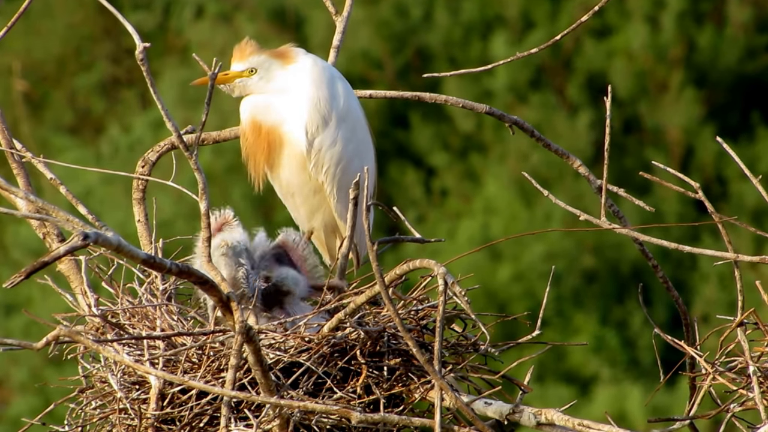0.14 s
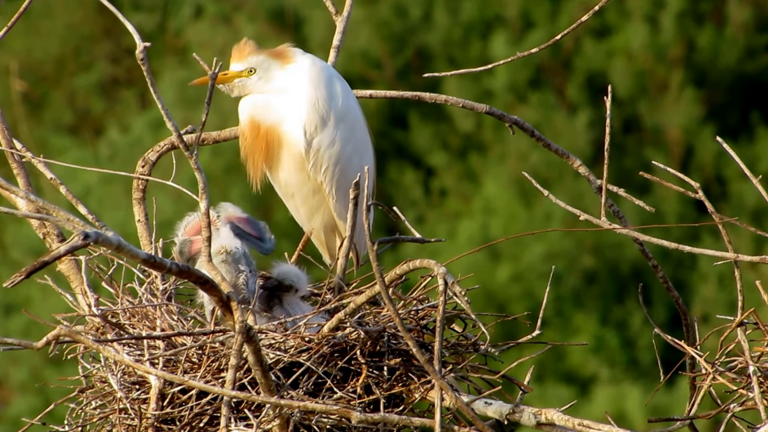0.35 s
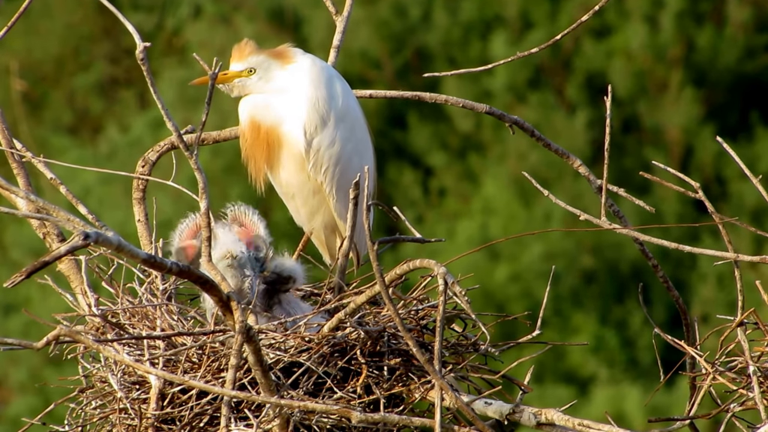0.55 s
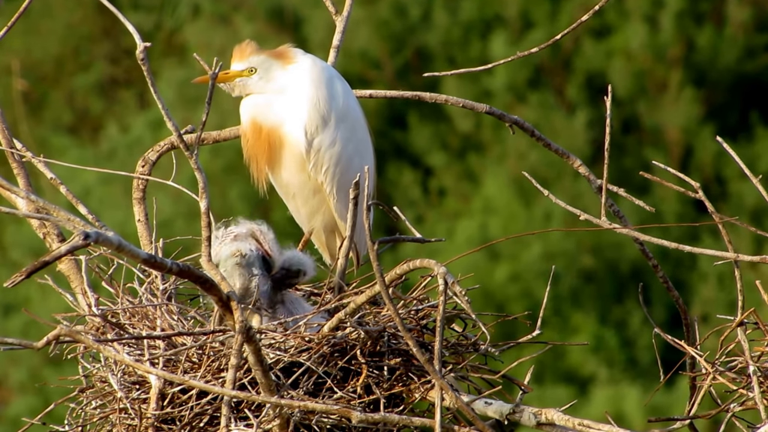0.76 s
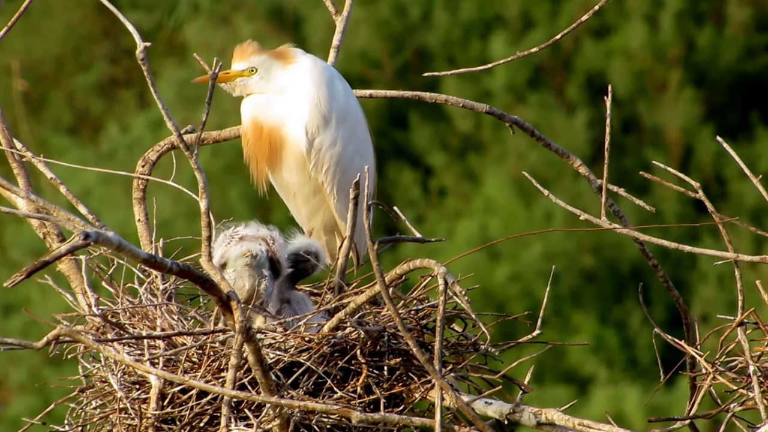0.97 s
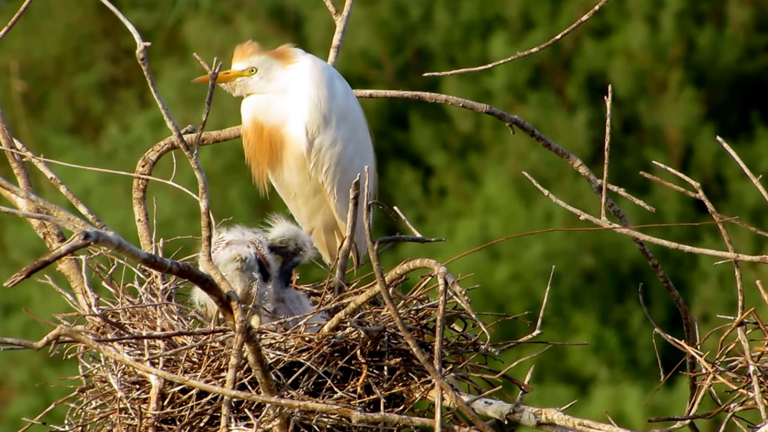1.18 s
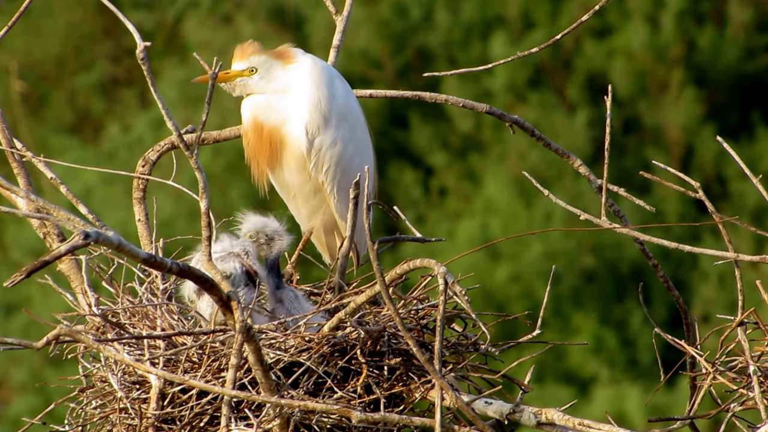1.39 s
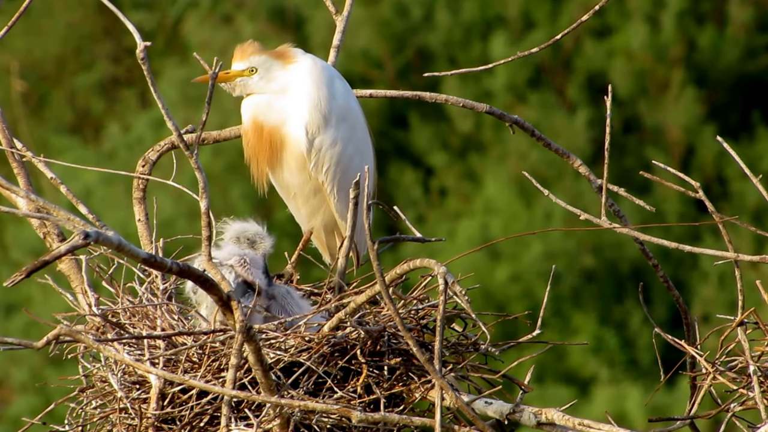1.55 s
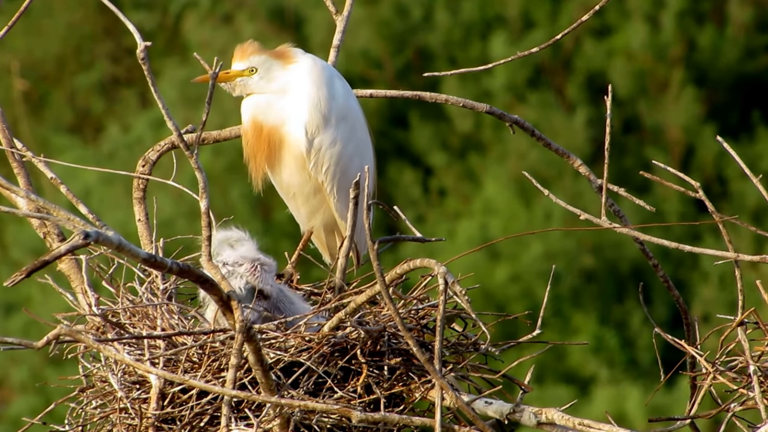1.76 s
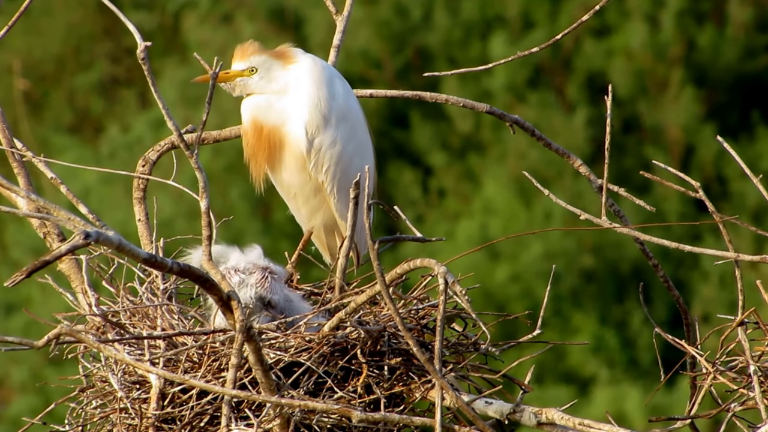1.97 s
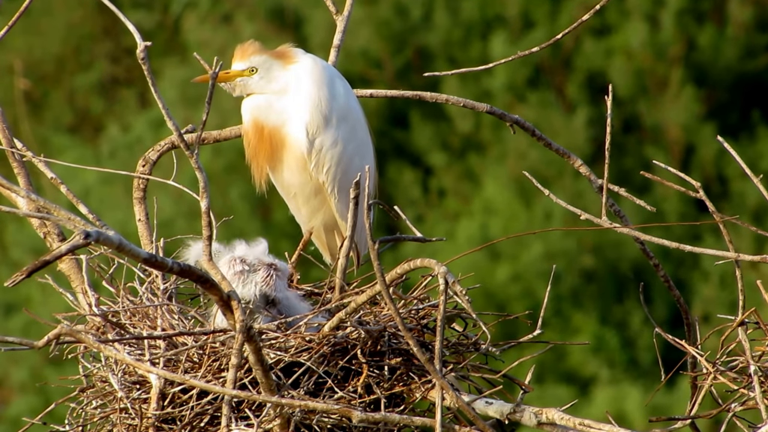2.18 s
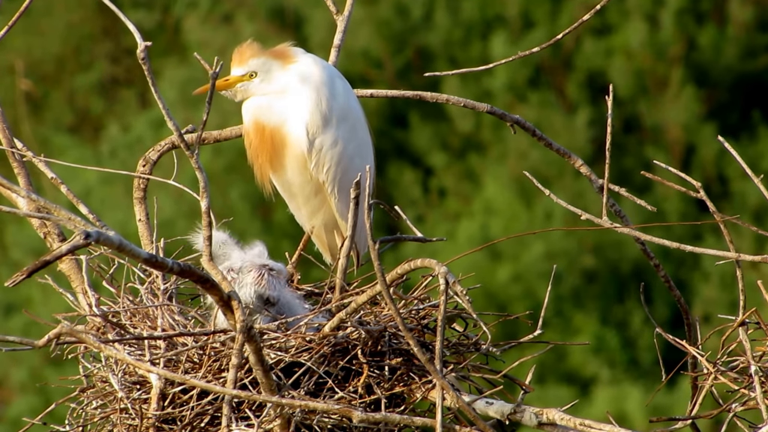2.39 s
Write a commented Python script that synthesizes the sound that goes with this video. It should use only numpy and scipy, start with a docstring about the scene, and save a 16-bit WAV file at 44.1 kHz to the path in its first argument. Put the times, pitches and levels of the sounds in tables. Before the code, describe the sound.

Hoarse egret squawks in a colony: one at 0.7-1.0 s, a longer, stronger, rougher one at 1.6-2.0 s. Short peeps and squeals scatter throughout, with rasps densest from 1.2 s and around 2.2 s. Dry close ticks with treble whirr at 0.1 and 2.43 s. Steady rush, a faint low engine, and wind thumps at the start and near 2.2-2.3 s; short branch echoes.

```python
"""Two long hoarse heron squawks in a colony: jittering harmonics and pulsed breath, filtered by a throat.
Around them come squeals, peeps and low far grunts (bent partials with sidebands), and rasps, further low grunts
and the rough breath of calls (grainy noise in one band). Dry ticks close to the microphones are decaying sines
in a treble whirr; a far idling engine is a sum of low sines.
The colony's rush and the wind on the two microphone ports are coloured noise."""
import sys
import numpy as np
from scipy import signal
from scipy.fft import rfft, irfft, next_fast_len
from scipy.io import wavfile
from scipy.ndimage import uniform_filter1d, map_coordinates

SR = 44100
rng = np.random.default_rng(int(sys.argv[2]) if len(sys.argv) > 2 else 0)


def master(y):
    """Save y as 16-bit WAV."""
    cut = np.clip(np.atleast_2d(y).T, -1, 1)
    pcm = np.round(cut * 32767)  # scale
    wavfile.write(sys.argv[1], SR, pcm.astype(np.int16))


N = 112014
T = np.arange(N) / SR

# Squeals, peeps and low far grunts of the colony. Each row: start in seconds, length in seconds,
# first, middle and last pitch in Hz, levels of partials 1 to 5 in dB, level of the quarter-pitch sidebands in dB,
# roughness 0-1, left minus right in dB.
TONAL_CALLS = [(0, 0.06, 1373, 1336, 1350, -51.5, -73, -79, -78, -81, -30, 0, -3),
               (0.177, 0.068, 1602, 1565, 1630, -53.5, -54.5, -70, -64, -74, -30, 0.5, -6),
               (0.336, 0.08, 592, 656, 687, -53, -59.5, -64, -74, -62, -28, 0.5, -3),
               (1.248, 0.084, 1255, 1267, 1344, -55, -60, -69, -74, -76, -30, 0.6, -3),
               (0.023, 0.026, 1705, 1840, 1790, -57, -50.5, -71, -74, -66, -30, 0.45, 2),
               (0.04, 0.057, 1708, 1680, 1710, -69, -52, -70, -72, -77, -30, 0.4, -2),
               (0.169, 0.053, 1846, 1825, 1700, -53, -45.5, -60, -59, -62, -32, 0.12, 2),
               (0.324, 0.049, 1787, 1818, 1770, -50, -47, -61, -66, -56, -30, 0.16, -3),
               (0.488, 0.058, 2640, 2590, 2510, -49, -62, -61, -72, -76, -40, 0.11, -3),
               (0.626, 0.035, 1660, 1790, 1810, -67, -47, -69, -65, -73, -37, 0.15, -1),
               (0.681, 0.043, 1855, 1910, 1960, -52, -52, -61, -80, -82, -30, 0.27, -1),
               (0.721, 0.067, 1792, 1780, 1767, -51, -51, -49.5, -62, -70, -23, 0.15, 2),
               (0.752, 0.045, 2010, 2000, 1990, -45, -49, -62, -75, -73, -20, 0.3, -2),
               (0.79, 0.09, 2060, 2055, 2110, -38.5, -46.5, -50, -66, -66, -18, 0.14, -2),
               (0.856, 0.049, 2138, 2210, 2084, -44, -44.5, -48.5, -68, -67, -22, 0.29, 1.5),
               (0.906, 0.11, 2220, 2183, 2240, -43.5, -64, -70.5, -80, -74, -30, 0.46, -2.5),
               (1.084, 0.025, 1926, 1894, 1890, -57, -53.5, -63, -79, -74, -9, 0.5, -5),
               (1.211, 0.053, 1890, 1910, 2030, -51, -52.5, -56.5, -66, -69, -30, 0.5, -2),
               (1.135, 0.053, 2740, 2744, 2750, -54, -78, -81, -81, -80, -30, 0.35, -1),
               (1.554, 0.028, 1590, 1600, 1590, -50, -62, -64, -72, -76, -30, 0.5, -2),
               (1.345, 0.045, 2120, 1990, 1900, -48, -72, -76, -65, -58, -15, 0.3, 1),
               (1.399, 0.14, 2100, 2100, 2070, -43, -42.5, -46, -61.5, -66, -2, 0.16, -2),
               (1.632, 0.11, 1802, 1816, 1887, -52, -44.5, -70, -83, -76, -25, 0.17, -4),
               (1.9, 0.066, 2065, 1986, 1940, -48.5, -68, -72, -76, -78, -30, .2, -2),
               (1.825, 0.033, 1740, 1790, 1850, -59, -49, -72, -69, -76, -30, .3, -10),
               (0.926, 0.092, 2110, 2040, 2050, -49, -61, -68, -79, -80, -30, 0.44, -1),
               (1.784, 0.033, 1694, 1800, 1720, -45.5, -43.5, -81, -54, -68, -25, 0.1, 1),
               (1.892, 0.105, 2450, 2370, 2230, -40, -71, -67, -72, -80, -19, 0.1, -2.5),
               (1.915, 0.07, 1790, 1880, 1760, -54, -49.5, -55, -64, -70, -30, 0.7, -1),
               (2.08, 0.048, 2020, 2000, 2010, -46.5, -50, -58, -65, -66, -26, 0.3, 0.5),
               (2.235, 0.05, 2160, 2210, 2200, -61, -43.5, -55, -69, -72, -20, 0.07, -8),
               (2.23, 0.075, 1920, 1974, 2018, -41, -63, -67, -57, -61, -4.5, 0.1, -3),
               (2.278, 0.11, 2085, 2033, 2156, -44, -46.5, -55, -69, -81, -5.5, 0.15, -3),
               (2.297, 0.051, 1630, 1678, 1750, -47.5, -48, -65, -66, -72, -27, 0.3, -2),
               (2.378, .11, 1870, 1913, 1930, -40.5, -66, -70, -74, -76, -27, 0.07, -1),
               (2.52, 0.017, 1970, 1960, 1930, -39.5, -64, -70, -68, -77, -15, 0.04, -1)]
# Sidebands above each partial, one row a partial: relative levels in dB at 1/4, 2/4 and 3/4 of the pitch above it.
SIDEBANDS = [(-2, -2, -6), (0, -11, -14), (0, -11, -14), (0, -8, -12), (0, -8, -12)]
ATTACK_SHARE, RELEASE_SHARE, FLUTTER_EDGE_SHARE = .16, .33, .35  # of a call's length
BREATH_DB, BREATH_HZ = -5, 500  # breath around each partial at roughness 1; knots a second of its random curve
RAGGED_ENDS, PITCH_SHAKE = .35, .03  # roughness added at both ends; relative pitch shake at roughness 1

# Engine orders. Each row: frequency in Hz, mean level in dB.
ENGINE_ORDERS = [(53, -45), (71, -44), (106, -49), (123, -51.5), (159, -56.5), (211, -61.5)]
ENGINE_PAN_DB, ENGINE_WAVER_DB, ENGINE_DRIFT_RAD = 8, 2.5, 1

# Spectrum of the colony's rush. Each row: frequency in Hz, relative gain in dB.
RUSH_SPECTRUM = [(25, -7.5), (42, -25), (55, -6), (119, -6.5), (227, -18), (330, -21), (450, -18),
                 (749, -20.5), (1000, -21), (1290, -23), (1960, -23), (2960, -27), (4150, -30.5),
                 (5670, -34), (8000, -38), (11100, -40.5), (13200, -46), (14300, -59), (15200, -59)]
# Course of the rush. Each row: time in seconds, level in dB before RUSH_RAISE_DB is added.
RUSH_COURSE = [(0.0, -49.5), (0.44, -50.5), (1.75, -49), (2.16, -51), (2.54, -48)]
RUSH_RAISE_DB = 7.5
# Spectrum of wind on the ports. Each row: frequency in Hz, relative gain in dB.
WIND_SPECTRUM = [(15, -2), (35, 4), (60, -2), (200, -6), (600, -15), (1470, -24), (2500, -29),
                 (4280, -33.5), (6420, -34.5), (8080, -37), (11100, -37.5), (13200, -43.5), (14800, -62)]
WIND_DB = -39.5
# Gusts in the low part of the wind. Each row: centre in seconds, 1/e half-width in seconds, dB over the calm.
GUSTS = [(.06, 0.088, 16.5), (.27, 0.055, 10), (.4, 0.037, 7), (.74, .04, 4), (2.18, .04, 10),
         (2.292, 0.0092, 23), (2.47, 0.034, 2)]

# Whirrs around the ticks. Each row: start in seconds, starting level in dB, time to fall 60 dB in seconds.
WHIRRS = [(0.07, -49.5, 0.27), (0.091, -41.5, 0.18), (.115, -51, 0.079), (.272, -52, 0.11),
          (2.426, -39.5, 0.33), (2.46, -40.5, 0.092), (2.48, -61, 0.071)]
# Spectrum of the whirr. Each row: frequency in Hz, relative gain in dB.
WHIRR_SPECTRUM = [(3000, 2), (6000, -5), (9000, -4.5), (12000, -1.5), (14000, -14), (15500, -32)]
# Ticks. Each row: start in seconds, level in dB before TICK_RAISE_DB is added, frequency in Hz, left minus right in dB.
TICKS = [(0.0925, -28.5, 11200, 3), (0.0993, -30, 8600, 5), (2.4267, -30, 7300, 16), (2.463, -28, 6240, 13)]
TICK_RAISE_DB, TICK_DECAY_S = 8, .00014

# Rasps, low grunts and rough breath of the calls. Each row: start in seconds, length without the closing tail
# in seconds, level in dB, band centre in Hz, band width (standard deviation) in octaves, left minus right in dB.
ROUGH_CALLS = [(0.19, 0.045, -47.5, 3020, 0.48, 2), (.33, 0.049, -51.5, 2170, 0.8, -2),
               (0.247, 0.029, -56, 4670, 0.24, 0), (0.527, 0.05, -45.5, 3330, 0.47, 1),
               (0.704, 0.11, -46, 3660, 0.68, -7), (1.022, 0.028, -57.5, 8000, 0.87, 4),
               (1.084, 0.087, -52.5, 2800, 0.2, -6), (1.242, 0.046, -43, 3000, 0.56, 0),
               (1.328, 0.16, -43.5, 3460, 0.62, 0), (1.404, .025, -43, 4370, 0.11, -10),
               (1.495, 0.058, -42.5, 5160, .8, 2.5), (1.601, 0.048, -43, 3080, 0.54, 1),
               (2.221, 0.038, -49.5, 436, 0.25, 16), (1.867, 0.064, -47.5, 456, 0.48, 2),
               (1.939, .075, -41, 2320, 0.16, -2), (2.085, .07, -48.5, 3100, .07, 0),
               (1.64, .07, -41.5, 2480, .12, -1), (2.069, 0.11, -45.5, 3220, 0.35, 0.5),
               (2.172, 0.11, -42.5, 3000, 0.72, -1.5), (2.229, 0.15, -42.5, 3670, 0.75, 0),
               (2.498, 0.037, -44, 2840, 0.21, 0)]
GRAIN_RATE, GRAIN_DB, ROUGH_EDGE_S = 2300, 0.5, 0.0069  # rate in knots a second
ROUGH_RELEASE_SHARE, ROUGH_PATCHY_DB = .45, 2.8

# The two squawks. Each row: time in seconds, pitch in Hz, level in dB, hoarseness 0-1.
SQUAWK_A = [(.705, 385, -44, 0.7), (.73, 393.8, -41, 0.2), (.79, 420.8, -39, 0.63), (.83, 423, -39, 0.3),
            (.86, 443.7, -38, 0.3), (.885, 440.8, -38.5, 0), (.915, 417.3, -40.5, 0), (.945, 436, -42, 0.7),
            (.975, 403, -43.5, 0), (1.025, 394, -51, 0.5)]
SQUAWK_B = [(1.6, 393.3, -48, 0.92), (1.635, 400.5, -39.5, 0.75), (1.67, 404, -36, 0.21),
            (1.705, 416.4, -35.5, 0.34), (1.74, 404.3, -37.5, 0.7), (1.775, 412, -36.5, 0.6),
            (1.81, 427.5, -36, 0.59), (1.85, 427.7, -37, 0.97), (1.885, 403, -37, 0.7),
            (1.92, 402.3, -42.5, 0.39), (1.955, 387, -46, 0.74), (2.0, 398, -45, 0.97)]
# Throat resonances of each squawk. Each row: frequency in Hz, relative gain in dB.
THROAT_A = [(800, -19.5), (1270, -13), (1680, -1.5), (1900, -7), (2150, -6.5), (2600, -7), (3100, -9),
            (4200, -15), (5500, -20), (7500, -18), (11000, -36)]
THROAT_B = [(800, -30), (1250, -12), (1480, -9), (1630, 0.5), (1820, -10), (2080, -3), (2250, -6.5),
            (2550, 1), (2720, -3), (2900, -6.5), (3300, -9.5), (3900, -9.5), (4300, -12), (5000, -21),
            (6200, -22.5), (7400, -13.5), (9000, -38), (12000, -54)]
JITTER, SHIMMER_DB, PHASE_SHAKE_RAD = .007, 2.5, .09  # jitter relative to pitch, phase shake per harmonic number
HALFWAY_DB = -5  # lines between the harmonics at full hoarseness
BREATH_SHARE = .5  # breath's share of power at full hoarseness
SQUAWK_PAN_DB = -2.5

LAG_RAD = 0.51  # phase by which the birds lag at the left port, equal at all frequencies
ECHO_DB, ECHO_T60_S = -11, .14

# Narrow dips in the response. Each row: centre in Hz, 1/e half-width in Hz, depth 0-1.
DIPS = [(3915, 95, .62), (7870, 85, .82)]
ROLL_HZ, ROLL_DB_PER_KHZ, TOP_HZ = 14300, 16, 16300


def amp(db):
    """Decibels to amplitude ratio."""
    return 10 ** (np.asarray(db) / 20)


def unit(x):
    """Normalisation to an rms of 1."""
    return x / np.sqrt(np.mean(x ** 2) + 1e-20)


def along(points, hz):
    """Interpolation of (Hz, value) points on a logarithmic frequency axis."""
    f, v = np.transpose(points)
    return np.interp(np.log(hz + 1), np.log(f + 1), v)


def wobble(rate, size=N):
    """Random modulation: a smooth curve through normal random knots, rate knots a second."""
    knots = rng.standard_normal(int(size * rate / SR) + 4)
    return map_coordinates(knots, [T[:size] * rate])


def filtered(x, response):
    """Linear filtering: the spectrum of x times a response of frequency."""
    m = next_fast_len(N + SR // 2)
    return irfft(rfft(x, m) * response(np.fft.rfftfreq(m, 1 / SR)), m)[..., :N]


def coloured(x, spectrum):
    """Spectral shaping by a gain table, brought to an rms of 1."""
    return unit(filtered(x, lambda hz: amp(along(spectrum, hz))))


def gate(t, start, length, edge):
    """Amplitude envelope: rise, hold, fall."""
    return np.clip(np.minimum(t - start, start + length - t) / edge, 0, 1) ** 2


def placed(x, pan_db):
    """Stereo placement by level difference, left minus right."""
    return x * amp([[pan_db / 2], [-pan_db / 2]])


def span(start, length):
    """Sample range of a short sound."""
    return slice(int(start * SR), min(N, int((start + length) * SR)))


def patches(shape, db, bins, frames):
    """Random gain over frequency and time, smoothed over bins and frames."""
    field = uniform_filter1d(rng.standard_normal(shape), size=bins, axis=0)
    return amp(db * unit(uniform_filter1d(field, size=frames, axis=1)))


def hiss(spectrum, patchy_db):
    """Coloured noise of rms 1 with time-frequency patches of random gain."""
    z = signal.stft(rng.standard_normal(N), nperseg=512)[2]
    x = signal.istft(z * patches(z.shape, patchy_db, bins=6, frames=10), nperseg=512)[1][:N]
    return coloured(x, spectrum)


def tonal_calls():
    """Modulated harmonics: five breathy partials on a bent pitch; flutter at a quarter of it adds sidebands."""
    out = np.zeros((2, N))
    for start, length, first, middle, last, *dbs, side_db, rough, pan_db in TONAL_CALLS:
        cut = span(start, length)
        waver = lambda rate: wobble(rate, size=cut.stop - cut.start)
        u = 2 * (T[cut] - start) / length - 1  # -1 at the start, 1 at the end
        pitch = middle + (last - first) / 2 * u + ((first + last) / 2 - middle) * u ** 2
        ragged = rough + RAGGED_ENDS * u ** 6
        phase = 2 * np.pi * np.cumsum(pitch * (1 + PITCH_SHAKE * ragged * waver(308))) / SR
        flutter = gate(T[cut], start, length, FLUTTER_EDGE_SHARE * length)
        tone = 0
        for k, db in enumerate(dbs):
            breath = amp(BREATH_DB) * np.sqrt(np.abs(ragged)) * (waver(BREATH_HZ) + 1j * waver(BREATH_HZ))
            sidebands = 0
            for j, above_db in enumerate(SIDEBANDS[k]):
                side_level = amp(side_db + above_db + 2.2 * waver(46))
                sidebands = sidebands + side_level * np.exp(1j * ((j + 1) * phase / 4 + .5 * waver(74)))
            partial = amp(db + (0.54 + 6.5 * rough) * waver(99.0)) * np.exp(1j * (k + 1) * phase)
            tone = tone + partial * (1 + breath + flutter * sidebands)
        shape = np.clip(np.minimum((1 + u) / ATTACK_SHARE, (1 - u) / RELEASE_SHARE) / 2, 0, 1)
        out[:, cut] += placed(np.sqrt(2) * tone.real * shape, pan_db)
    return out


def engine():
    """Additive synthesis: low orders of a far idling engine, each wavering in level and phase."""
    hum = 0
    for hz, db in ENGINE_ORDERS:
        level = amp(db + ENGINE_WAVER_DB * wobble(4.794)) * np.sqrt(2)
        hum = hum + level * np.sin(2 * np.pi * hz * T + ENGINE_DRIFT_RAD * wobble(6.14))
    return placed(hum, ENGINE_PAN_DB)


def colony_rush():
    """Broadband noise of the colony, with a slowly varying level."""
    s, db = np.transpose(RUSH_COURSE)
    return hiss(RUSH_SPECTRUM, patchy_db=2.5) * amp(np.interp(T, s, db) + RUSH_RAISE_DB)


def port_wind():
    """Turbulence noise at the ports: gusts raise only its low-frequency part."""
    steady = hiss(WIND_SPECTRUM, patchy_db=0.5)
    gusts = amp(sum(db * np.exp(-((T - s) / w) ** 2) for s, w, db in GUSTS))
    low = filtered(steady, lambda hz: 1 / (1 + (hz / 150) ** 2))
    return amp(WIND_DB) * (steady - low + low * gusts)


def air():
    """Middle-side superposition: the rush in phase, the wind in opposite phase at the two ports."""
    rush, wind = colony_rush(), port_wind()
    return np.array([rush + wind, rush - wind])


def ticks():
    """Impulsive decay: sharp damped sines close by, amid decaying treble noise."""
    out = np.zeros((2, N))
    for s, db, hz, pan_db in TICKS:
        u = np.maximum(T - s, 0)
        ring = np.sin(2 * np.pi * hz * u) * np.exp(-u / TICK_DECAY_S)
        out += placed(amp(db + TICK_RAISE_DB) * ring, pan_db)
    level = sum(amp(db - 60 * np.abs(T - s) / t60) * gate(T, s, 1, 0.001) for s, db, t60 in WHIRRS)
    return out + level * np.array([hiss(WHIRR_SPECTRUM, patchy_db=1.5), hiss(WHIRR_SPECTRUM, patchy_db=1.5)])


def rough_calls():
    """Band-filtered turbulence: grainy, blotchy noise in one throat band; sharp start, softer end."""
    out = np.zeros((2, N))
    for start, length, db, hz, octaves, pan_db in ROUGH_CALLS:
        cut = span(start, length + .02)
        size = cut.stop - cut.start
        grains = rng.standard_normal(size) * amp(GRAIN_DB * wobble(GRAIN_RATE, size=size))
        f, _, z = signal.stft(grains, SR, nperseg=256)
        blotches = patches(z.shape, ROUGH_PATCHY_DB, bins=3, frames=3)
        band = np.exp(-.5 * (np.log2((f + 1) / hz) / octaves) ** 2) / (1 + (f / 12000) ** 8)
        voice = unit(signal.istft(z * band[:, None] * blotches, SR, nperseg=256)[1][:size])
        t = T[cut] - start
        attack = np.clip(t / ROUGH_EDGE_S, 0, 1)
        release = np.clip((length + 0.019 - t) / (ROUGH_RELEASE_SHARE * length + 0.0092), 0, 1)
        out[:, cut] += placed(voice * amp(db) * attack * release, pan_db)
    return out


def squawk(rows, throat):
    """Source and filter: unsteady harmonics, halfway lines when hoarse and breath pulsed once a cycle, in a throat."""
    s, *cols = np.transpose(rows)
    pitch, db, hoarse = [np.interp(T, s, c) for c in cols]
    hoarse = np.clip(hoarse, 0, 1)
    phase = 2 * np.pi * np.cumsum(pitch * (1 + JITTER * wobble(120))) / SR
    shaken = lambda multiple, k: np.cos(multiple * phase + PHASE_SHAKE_RAD * k * wobble(150))
    harmonics = sum(amp(SHIMMER_DB * wobble(76)) * shaken(k, k) for k in range(2, 13))
    halfway = sum(amp(2 * SHIMMER_DB * wobble(40)) * shaken(k + .5, k) for k in range(3, 12))
    voiced = harmonics + amp(HALFWAY_DB) * np.sqrt(hoarse) * halfway
    breath = (1 + np.cos(phase)) ** 2 * rng.standard_normal(N)
    share = BREATH_SHARE * hoarse
    voice = np.sqrt(1 - share) * coloured(voiced, throat) + np.sqrt(share) * coloured(breath, throat)
    return placed(voice * amp(db) * gate(T, s[0], s[-1] - s[0], 0.0094), SQUAWK_PAN_DB)


def thicket(x):
    """Phase difference and scattering: the ports hear the birds out of phase, with short echoes from branches."""
    t = T[:SR // 5]
    tail = rng.standard_normal((2, len(t))) * amp(-60 * t / ECHO_T60_S)
    sides = np.array([[-1], [1]])
    direct = filtered(x, lambda hz: np.exp(.5j * LAG_RAD * sides * np.ones_like(hz)))
    echoes = signal.fftconvolve(x, tail / np.linalg.norm(tail[0]), axes=1)[:, :N]
    return direct + amp(ECHO_DB) * echoes


def scene():
    """Superposition: the birds in their thicket, with the ticks, engine and air added without echo."""
    birds = tonal_calls() + rough_calls() + squawk(SQUAWK_A, THROAT_A) + squawk(SQUAWK_B, THROAT_B)
    return thicket(birds) + engine() + air() + ticks()


def record(dry):
    """Frequency response: narrow dips, a treble roll-off and a band limit."""
    def response(hz):
        dips = np.prod([1 - depth * np.exp(-((hz - c) / w) ** 2) for c, w, depth in DIPS], axis=0)
        roll_off = amp(-ROLL_DB_PER_KHZ * np.maximum(hz - ROLL_HZ, 0) / 1000)
        return dips * roll_off * (hz < TOP_HZ)
    return filtered(dry, response)


dry = scene()
out = record(dry)
master(out)
```